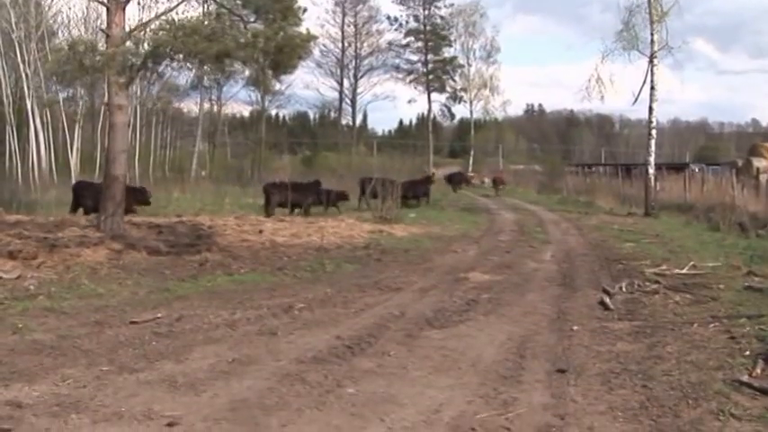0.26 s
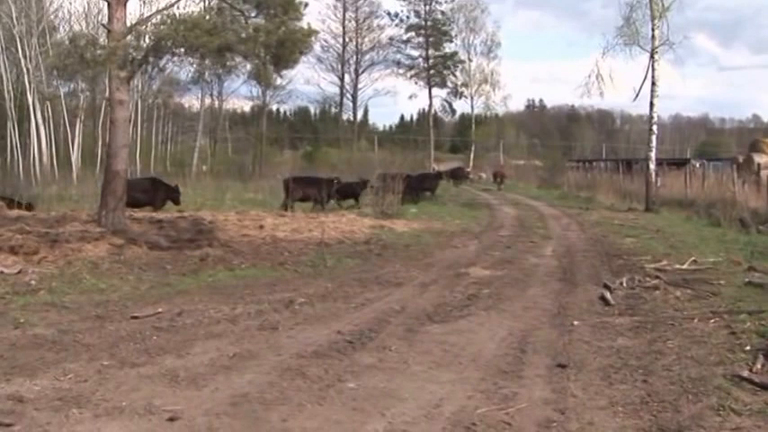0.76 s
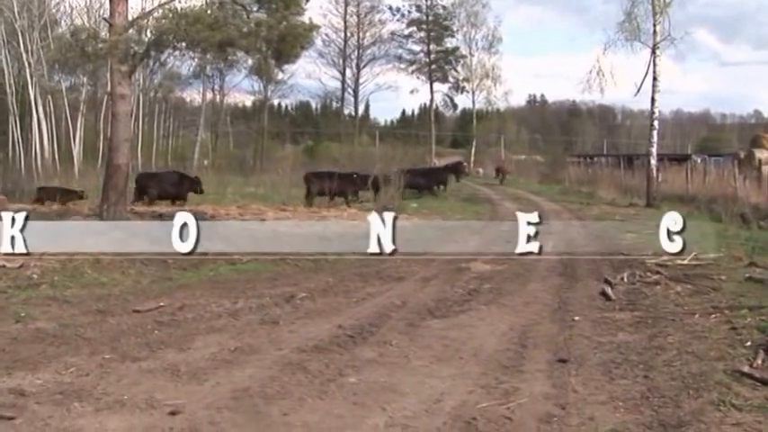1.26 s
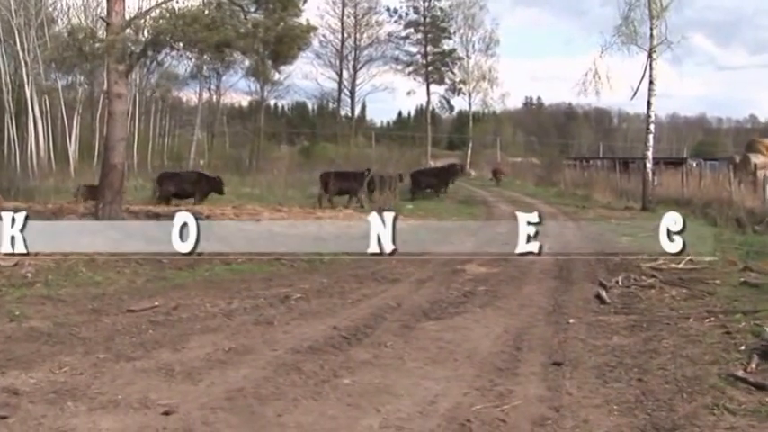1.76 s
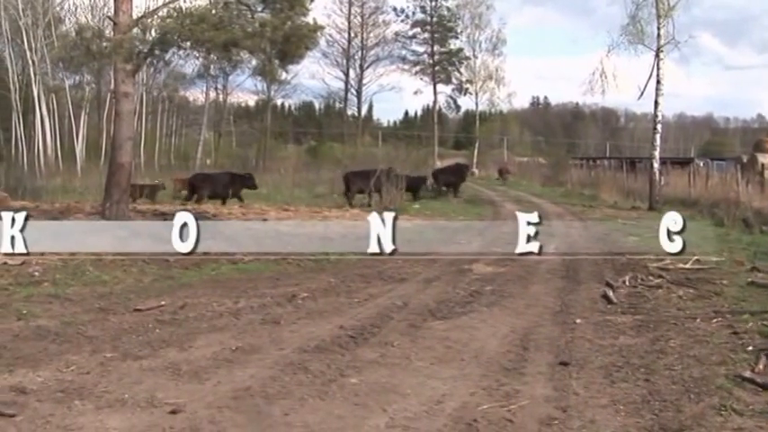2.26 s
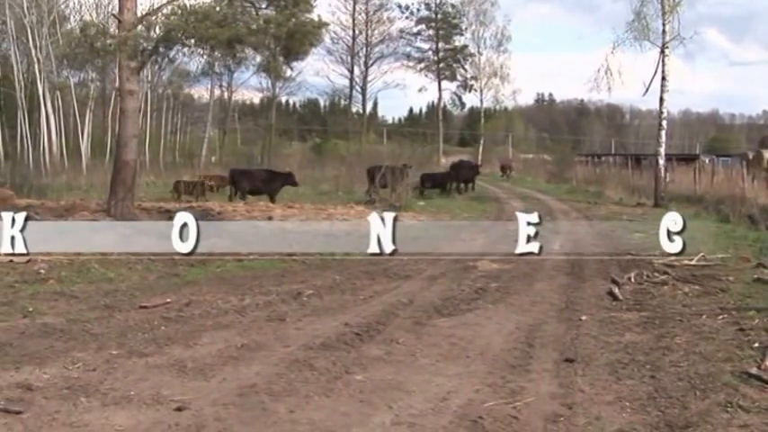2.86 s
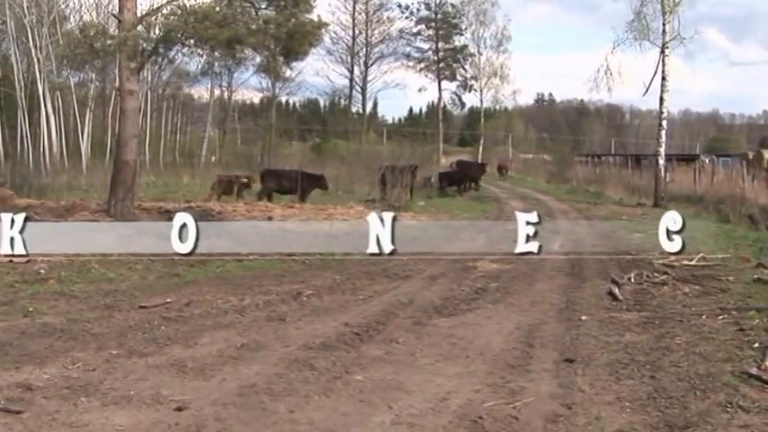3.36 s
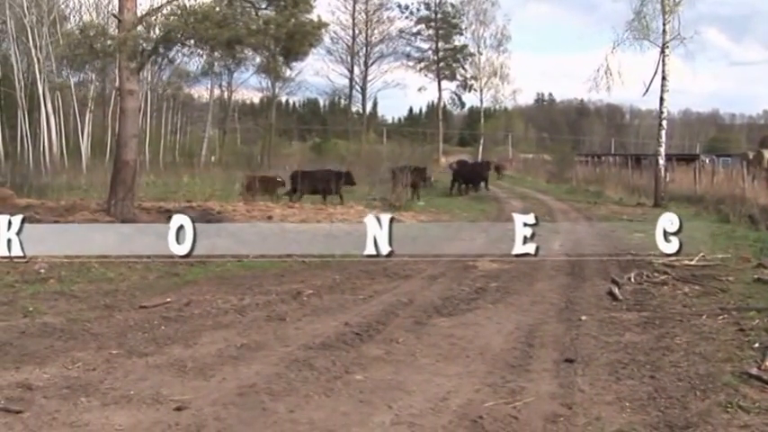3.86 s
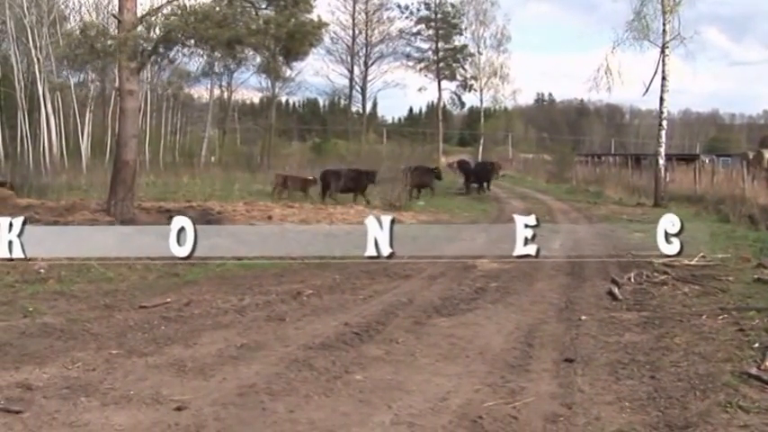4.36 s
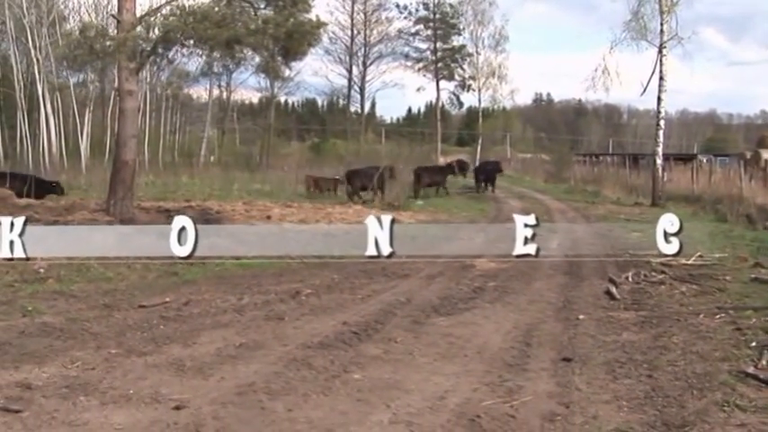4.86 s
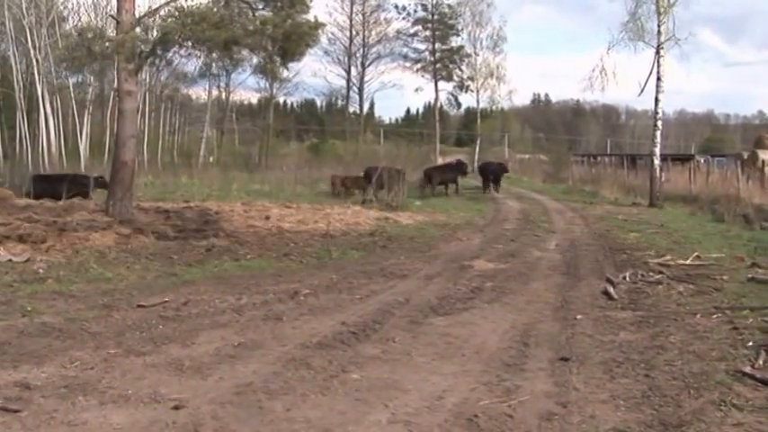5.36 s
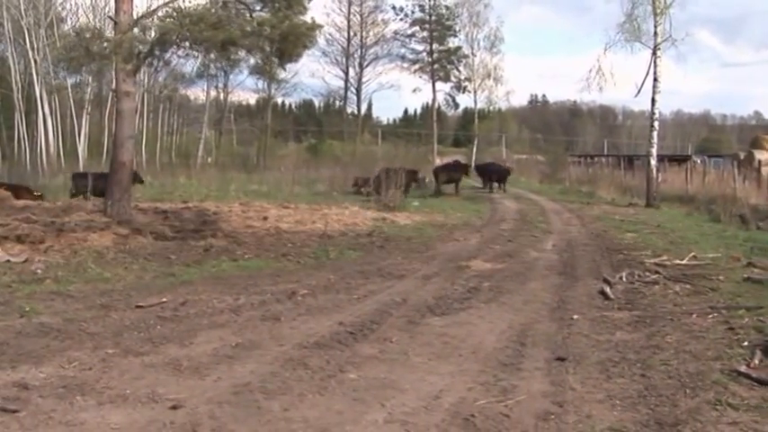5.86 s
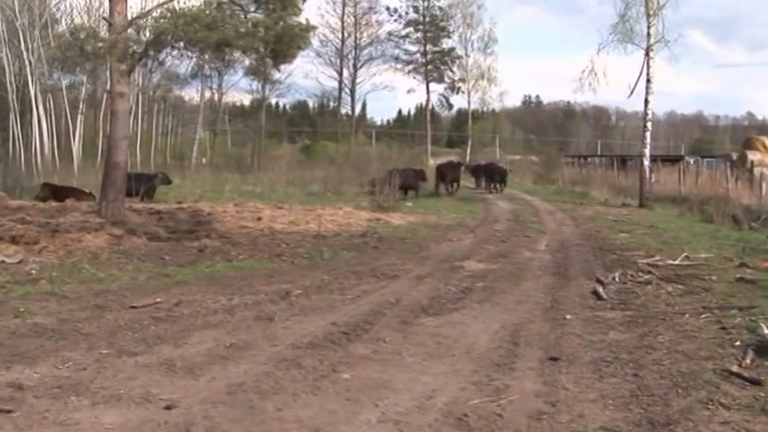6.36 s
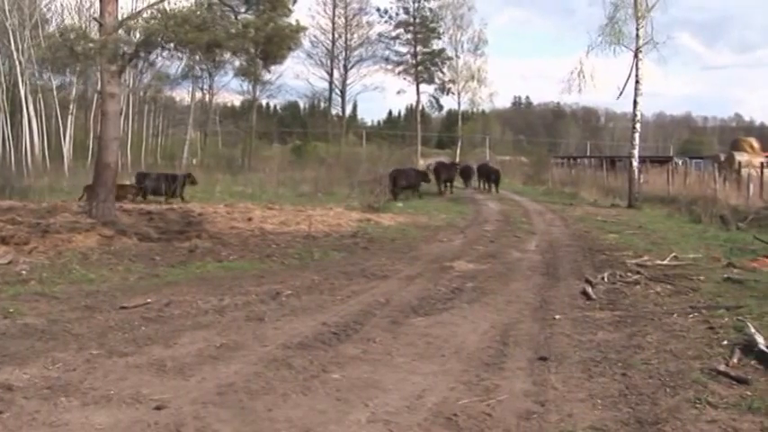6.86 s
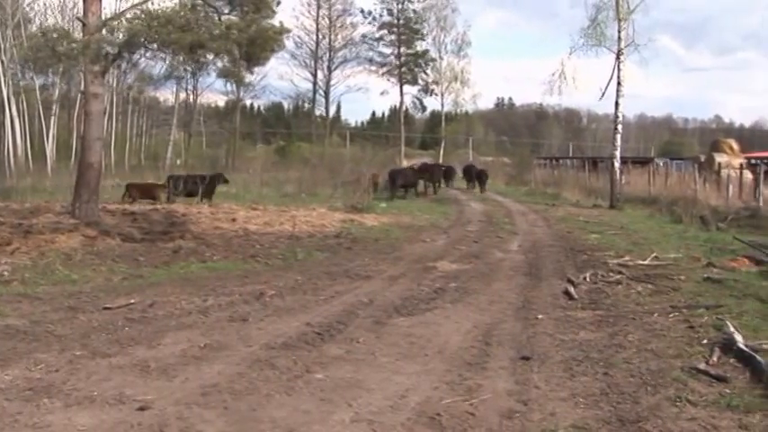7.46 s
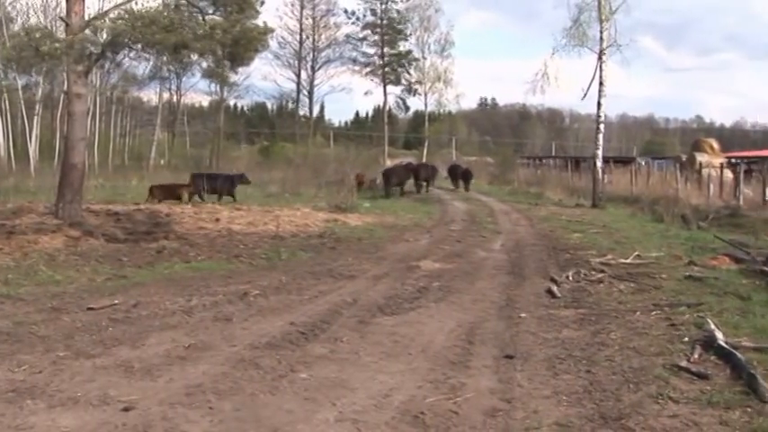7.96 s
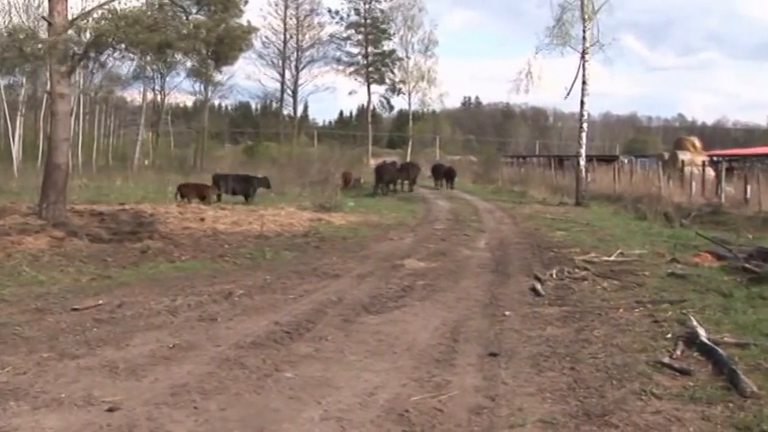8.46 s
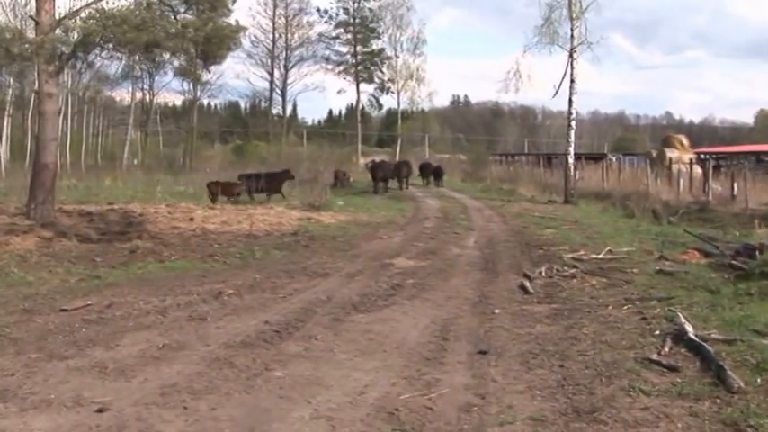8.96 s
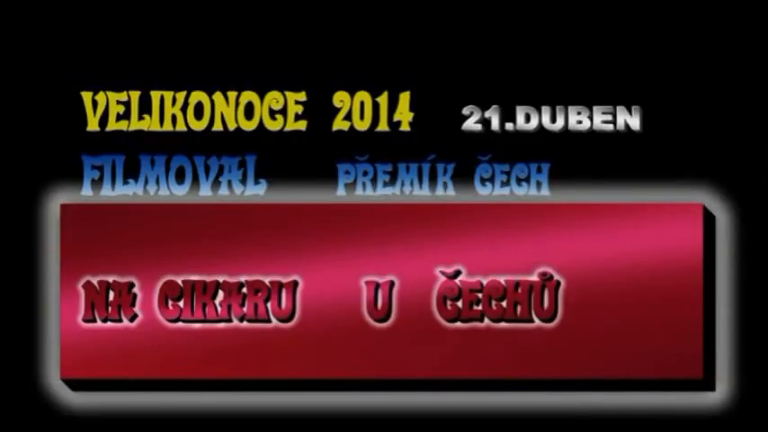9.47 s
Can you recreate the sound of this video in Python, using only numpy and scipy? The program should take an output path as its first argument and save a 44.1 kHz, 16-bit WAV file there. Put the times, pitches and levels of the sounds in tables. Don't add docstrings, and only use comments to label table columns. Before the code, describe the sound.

A stereo outdoor scene: moos of varied pitch overlap at once, mostly right of centre, with a blurred murmur of farther cattle and a dull echo from trees. An idling diesel throbs and rattles underneath throughout. Grass crackles brightly at left, occasional twigs crack, and thin bird whistles appear twice. Later, deep nasal lows from a close cow stand out almost centrally, the last one cut off by the sudden end.

```python
import sys
import numpy as np
from scipy import signal
from scipy.io import wavfile
from scipy.ndimage import uniform_filter1d

SR = 44100
rng = np.random.default_rng(int(sys.argv[2]) if len(sys.argv) > 2 else 0)


def wav_out(sig):
    wavfile.write(sys.argv[1], SR, np.round(np.clip(np.atleast_2d(sig).T, -1, 1) * 32767).astype(np.int16))


def level_to_linear(level):
    exponent = np.asarray(level, float) / 20
    return 10 ** exponent


N = 428211
TIME = np.arange(N) / SR
END_S = 9.2445
ENGINE_CYCLE_HZ, ENGINE_START_CYCLES = 5.741, .94
LEFT_RIGHT = np.array([[1], [-1]])


def at_hz(points, hz):
    point_hz, value = np.transpose(points)
    return np.interp(np.log(hz), np.log(point_hz), value)


def bandpass(x, low_hz, high_hz, order=2):
    return signal.sosfilt(signal.butter(order, [low_hz, high_hz], "band", fs=SR, output="sos"), x)


def drift(rate_hz, size):
    r = np.exp(-80 * np.pi * rate_hz / SR)
    white = rng.standard_normal(max(size, 2 * SR) // 40 + 1002)
    slow = signal.lfilter([1], [1, -2 * r, r * r], white)[500:]
    return np.interp(np.arange(size) / 40, np.arange(len(slow)), slow / slow.std())


def banded_noise(spectrum, gate_db, patchy_db, extra_width_db):
    # (frequency [Hz], side minus mid [dB])
    width = [(60, -14), (180, -20), (550, 0), (1650, -11), (4970, 4), (15000, -0.5)]
    # (frequency [Hz], left minus right [dB])
    balance = [(60, 0.5), (240, -2), (950, 2.5), (3770, 2), (15000, 3)]
    out = 0
    edges_hz = 100 * 2 ** np.arange(0, 7.4, 1 / 3)
    white = rng.standard_normal((2, 2, N))
    for k, (low_hz, high_hz) in enumerate(zip(edges_hz, edges_hz[1:])):
        mid, side = bandpass(white[k % 2], low_hz, high_hz, 3)
        hz = np.sqrt(low_hz * high_hz)
        gain = level_to_linear(at_hz(spectrum, hz) + gate_db(hz) + patchy_db * drift(10.3, N))
        lean = level_to_linear(at_hz(balance, hz) / 2 * LEFT_RIGHT)
        side_gain = level_to_linear(at_hz(width, hz) + extra_width_db)
        out = out + gain * lean * (mid + side_gain * side * LEFT_RIGHT)
    return out / out.mean(axis=0).std()


def moo(tract, voice, tone, aside, rows):
    # (frequency [Hz], left minus right [dB])
    right_lean = [(200, .8), (400, .1), (600, -4.5), (830, -1.5), (1000, -6), (1250, -6), (1550, -10),
                  (2300, -6)]
    # (frequency [Hz], lag [rad])
    lag = [(200, .08), (400, .6), (600, 1), (850, 1.3), (1150, .9), (1400, 1.5), (1520, 2.5), (1750, .3),
           (2300, .1)]
    dulling_db = 8
    (first, second, rough, *octave), (hum_db, bright_db) = voice, tone
    s, pitch_hz, lower_db, upper_db = np.transpose(rows)
    span = slice(round(s[0] * SR), round(s[-1] * SR))
    t, out = TIME[span], np.zeros((2, N))
    smooth_hz = uniform_filter1d(np.interp(t, s, pitch_hz), 900, mode="nearest")
    phase = 2 * np.pi * np.cumsum(smooth_hz * (1 + .02 * rough * drift(25, len(t)))) / SR
    since_s = t - s[0] + (s[0] == 0)
    left_s = s[-1] - t + (s[-1] > END_S - .02)
    edge = np.clip(np.minimum(since_s, left_s) / .03, 0, 1)
    closing_db = dulling_db * ((s - s[0]) / (s[-1] - s[0])) ** 2
    lower = lower_db - at_hz(tract, first * pitch_hz)
    upper = upper_db - at_hz(tract, second * pitch_hz)
    step = 1 + len(octave)
    for k in range(step, 19, step):
        if k * pitch_hz.max() > 3400:
            break
        effort_db = lower + (upper - lower) * np.clip((k - first) / (second - first), 0, 1)
        colour_db = at_hz(tract, k * pitch_hz) + hum_db * (k == 1) - 15 * (1 < k < first)
        colour_db = colour_db + (bright_db - closing_db) * (k > second)
        level = np.sqrt(2) * level_to_linear(np.interp(t, s, effort_db + colour_db)) * edge
        level *= 1 + rough ** .5 * (.3 * drift(6, len(t)) + .55 * drift(45, len(t)))
        hz = k * np.median(pitch_hz)
        ears = level_to_linear(aside * at_hz(right_lean, hz) * np.array([.5, -.5]))
        ears = ears * np.exp(-.5j * aside * at_hz(lag, hz) * np.array([1, -1]))
        ears = ears[:, None] / abs(ears.mean())
        out[:, span] += level * np.imag(ears * np.exp(1j * (k * phase + k * k)))
    return out


def arch(share, top, rise, fall, rise_bend, fall_bend):
    top = np.clip(top, .02, .98)
    early = np.maximum(1 - share / top, 0)
    late = np.maximum((share - top) / (1 - top), 0)
    return -rise * early ** rise_bend - fall * late ** fall_bend


def herd_call(event, pitch, tone):
    sag_bend, swell_bend, fade_bend = 2.7, 2.3, 2.2
    s, length_s, lower_db, upper_db, loudest = event
    from_hz, top_hz, end_hz, top, bend = pitch
    *_, swell_db, fade_db, trail = tone
    share = np.linspace(0, 1, 25)
    hz = top_hz + arch(share, top, top_hz - from_hz, top_hz - end_hz, bend, sag_bend)
    lower = lower_db + arch(share, loudest, swell_db, fade_db, swell_bend, fade_bend)
    upper = upper_db + arch(share, loudest + trail, swell_db, fade_db, swell_bend, fade_bend)
    return np.transpose([s + length_s * share, hz, lower, upper])


def herd():
    # (start [s], length [s], lower overtone [dB], upper overtone [dB], loudest at [share])
    events = [(0, .64, -28, -14, .45), (0, 0.71, -23.5, -26, 0.25), (.55, .8, -36, -27.5, .62),
              (1.052, 0.72, -34, -31, 0.17), (1.269, 1.31, -20, -21.5, .52), (1.88, 0.57, -48, -38, 0.66),
              (2.097, .58, -38, -46, 0.88), (2.72, 0.57, -29.5, -29, 0.58), (2.981, 0.27, -37, -23.5, .4),
              (3.219, .33, -32.5, -17, 0.6), (3.02, 0.75, -28, -26, 0.39), (3.46, .69, -27, -33, .8),
              (3.88, .43, -48, -27, .65), (5.03, 0.86, -24, -27, .45), (5.251, 1.53, -27.5, -24, .35),
              (5.721, 0.71, -32, -30.5, 0.42), (5.98, .97, -27, -22.5, .48), (5.959, 0.77, -20.5, -24, .55),
              (6.899, .4, -37, -26, .35), (7.14, .66, -26.5, -19, .75), (7.219, 0.84, -25.5, -26.5, 0.59),
              (7.74, 0.4, -28, -26.5, .7), (8.1, 0.68, -31.5, -27.5, 0.45), (8.8, 0.45, -31, -26.5, 1)]
    # (start [Hz], top [Hz], end [Hz], top at [share of length], bend of rise [1 = straight])
    pitches = [(267, 276, 265, .32, 2.1), (283.3, 284, 232, .25, 1.9), (164.5, 213.5, 204, .55, 1.9),
               (210.2, 222, 223, .7, 2.1), (164.7, 197.3, 167, .6, 2.6), (208.3, 211.8, 206.8, 0.405, 2.15),
               (313.4, 316.8, 316.4, 0.78, 1.3), (303, 338, 340, .9, 1.5), (245, 254.2, 280, .68, 1.29),
               (296.5, 298, 293, .7, 1.46), (154.8, 206.6, 170, .72, 1.4), (211.7, 215.5, 180, .85, 4.95),
               (228.7, 240, 228.5, .75, 1.5), (159.2, 205, 168, .62, 1.9), (229, 258, 243.5, .65, 2.5),
               (210.5, 214, 213.4, 0.51, 1.5), (318, 331.3, 311, .52, 1.6), (173, 194, 177, .6, 2.1),
               (201.5, 201, 196.5, .1, 2.1), (295, 341, 380, 0.96, 2.5), (162, 196.5, 174, .7, 2.6),
               (171.3, 206, 240, 0.96, 1.1), (206.8, 213, 199.4, .75, 4), (300, 322.3, 322.3, 1, 2.2)]
    voices = [(2, 4, .03, 2), (2, 3, .05), (3, 4, .06), (3, 6, .1), (3, 6, .02), (3, 5, .1), (1, 4, .12),
              (2, 4, .15), (3, 5, .3), (2, 4, .3), (3, 6, .1), (3, 6, .03), (2, 4, .03), (3, 6, .22),
              (3, 5, .08), (3, 6, .06), (2, 4, .08), (3, 7, .06), (3, 6, .2), (2, 4, .12), (3, 6, .07),
              (3, 5, .12), (3, 6, .07), (2, 4, .06)]
    # (fundamental hum [dB], top brightness [dB], swell [dB], fade [dB], upper trails by [share])
    tones = [(-13, -2.2, 10, 7, .01), (-7, -9, 3, 12, -0.058), (7, -11, 13, 3, .01),
             (-27, .2, -1, 21, 0.043), (-15, -1.5, 21, 27, -.22), (-9.5, 8, 15, 1.5, .01),
             (9, 3.5, 11, 12, -0.0028), (.6, -0.5, 15, 7, -0.18), (-4, -3, 2, 15, 0.12),
             (4, -11.5, 16, 23, .01), (2.5, -3.1, 16.5, 9.5, 0.052), (2.5, 10.5, 6, 21, .01),
             (-10, -19, 14, 7, -0.068), (2.2, 0, 9, 5, .15), (-12, -2.2, 18, 19, .37), (6, 5, 9, 3, .01),
             (-6, -2.5, 16, 7.5, 0.093), (-10, 2.2, 14, 13, -.15), (3, -2, 10, 12, .01),
             (-4, -2.5, 19, 33, -.48), (1.5, -.5, 15, 6, 0.13), (5, -14, 7, .3, -0.019),
             (5, 1.2, 3.5, 1, .01), (-6, -1.2, 15, -5, 0.049)]
    # (frequency [Hz], level [dB])
    throat = [(200, -0.5), (400, -14), (590, 0.5), (810, -12.5), (1000, -4), (1180, 1.5), (1350, 0.5),
              (1470, -11.5), (1660, -5), (2000, -10), (2550, -9), (3500, -28)]
    return sum(moo(throat, voice, tone[:2], 1, herd_call(event, pitch, tone))
               for voice, tone, event, pitch in zip(voices, tones, events, pitches))


def trees(x, t60_s, dull_hz):
    t = np.arange(round(.8 * SR)) / SR
    tail = rng.standard_normal((2, len(t))) * level_to_linear(-60 * t / t60_s) * (t > .03)
    tail = bandpass(tail, 350, dull_hz)
    tail = tail / np.sqrt((tail ** 2).sum(axis=1, keepdims=True))
    return signal.fftconvolve(x, tail, axes=1)[:, :N]


def murmur():
    # (time [s], level [dB])
    swell = [(0.0, -19.5), (4.02, -20.5), (4.48, -26), (6.25, -18.5), (9.07, -20.5), (9.2, -54)]
    # (frequency [Hz], density [dB per Hz])
    colour = [(350, -44.5), (480, 4), (620, -6), (800, -4), (1150, 3.5), (1500, -1), (2200, -7.5),
              (3200, -37.5)]
    level = level_to_linear(np.interp(TIME, *np.transpose(swell)) - 5.5)
    return level * banded_noise(colour, lambda hz: 0, 2.5, .1)


def exhaust():
    # (share of engine cycle [0-1], level [dB])
    puff_table = [(0.079, -0.5), (0.189, -1), (0.379, -6), (.62, -1), (0.743, -4), (0.858, -1.5)]
    # (frequency [Hz], level [dB], t60 [s])
    modes = [(27, -33, .2), (42, -22.5, 0.25), (75.4, -20.5, 0.17), (96.4, -22.5, 0.16), (177, -28, .1),
             (257.5, -26, 0.089)]
    cycles, puffs = np.arange(-3, 53)[:, None], np.zeros(N + SR)
    share, db = np.transpose(puff_table)
    at = ((cycles + ENGINE_START_CYCLES + share) / ENGINE_CYCLE_HZ * SR + SR).astype(int)
    puffs[at] = level_to_linear(db + 2.3 * rng.standard_normal(at.shape))
    out = 0
    for k, (hz, level_db, t60_s) in enumerate(modes):
        r, w = level_to_linear(-60 / (t60_s * SR)), 2 * np.pi * hz / SR
        ring = signal.lfilter([0, np.sin(w)], [1, -2 * r * np.cos(w), r * r], puffs)
        out = out + (-1) ** k * level_to_linear(level_db) * ring
    return bandpass(out, 22, 400)[SR:]


def rumble():
    level_db, side_db = -40, -5
    mid, side = bandpass(rng.standard_normal((2, N)), 25, 110)
    return level_to_linear(level_db) / mid.std() * (mid + level_to_linear(side_db) * side * LEFT_RIGHT)


def rattle():
    # (share of engine cycle [0-1], level over steady rattle [dB], length [s])
    knocks = [(0.06, 5.2, 0.014), (0.336, 3.5, 0.005), (.59, 2, 0.0078), (.82, 0.3, 0.0091)]
    # (frequency [Hz], density [dB per Hz])
    colour = [(100, 4.5), (160, -0.5), (280, 3), (400, -14), (1000, -2), (2000, -19.5), (2600, 4),
              (3200, -20.5), (4000, -20.5), (5900, -29.5), (7000, -49), (8500, -60), (11500, -37.5),
              (15700, -43.5)]
    level_db = -25
    turn = TIME * ENGINE_CYCLE_HZ - ENGINE_START_CYCLES
    swell_db = 0
    for share, db, length_s in knocks:
        from_knock_s = ((turn - share + .5) % 1 - .5) / ENGINE_CYCLE_HZ
        swell_db = swell_db + db * np.exp(-(from_knock_s / length_s) ** 2)
    swell_db = swell_db * (1 + 0.17 * drift(6.2, N))

    def gate_db(hz):
        return swell_db * np.interp(hz, [1500, 2880, 4200, 5840, 8260], [0.27, 1.39, 0.56, 1.59, .3])

    return level_to_linear(level_db) * banded_noise(colour, gate_db, 1.56, 0.11)


def rustle():
    # (time [s], peak [dB])
    snaps = [(0.8205, -34.5), (0.9692, -44), (.42, -38), (1.62, -39), (1.908, -28), (2.0328, -39.5),
             (2.4543, -37), (3.3852, -34.5), (3.4226, -31.5), (3.7259, -28.5), (3.9589, -39.5),
             (4.0841, -36), (4.142, -40.5), (4.2672, -35.5), (5.05, -40), (5.9414, -37), (7.04, -39),
             (7.9788, -35), (8.0701, -31), (8.2053, -42)]
    crackle_per_s, spread_s, calm = 130, .07, .3
    stir = calm + sum(level_to_linear((db + 32) / 2) * np.exp(-((TIME - s) / spread_s) ** 2) for s, db in snaps)
    clicks = level_to_linear(-54 + 3.8 * np.minimum(rng.exponential(1, N), 5))
    clicks = clicks * (rng.random(N) < crackle_per_s * stir / SR)
    for s, db in snaps:
        clicks[round(s * SR)] = level_to_linear(db + 5.0)
    decay = signal.lfilter([1], [1, -np.exp(-1 / (0.0054 * SR))], clicks)
    burst = decay * rng.standard_normal((2, N))
    burst[1] = 0.607 * burst[0] + .5 * burst[1]
    return bandpass(burst, 9000, 16500, 4) * level_to_linear(2.5 * LEFT_RIGHT)


def twigs():
    # (time [s], peak [dB])
    cracks = [
        (1.9076, -28),
        (4.2667, -26),
        (4.7451, -28),
        (5.0489, -27),
        (7.0369, -21),
    ]
    ring_s = .003
    clicks = np.zeros(N)
    for s, db in cracks:
        clicks[round(s * SR)] = level_to_linear(db - 1.5)
    decay = signal.lfilter([1], [1, -np.exp(-1 / (ring_s * SR))], clicks + 1e-18)
    return bandpass(decay * rng.standard_normal(N), 3300, 8000) * level_to_linear(1.5 * LEFT_RIGHT)


def near_call(event, effort):
    # (time before break [s], pitch [Hz], fundamental [dB], second overtone [dB])
    run_up = [(.87, 61.6, -34, -48), (.62, 80, -25, -43), (.41, 85, -32, -28.5), (.23, 102, -27.5, -26),
              (.115, 127, -25.5, -22), (.05, 150, -18, -20), (.016, 167, -18.5, -34)]
    break_hz, rest_hz, close_sag = 214, 200.5, .88
    settle_s, push_s, close_s = .19, .11, .05
    break_db, second_db, close_db = -2, -14.5, -17.5
    (s, jump, end, end_hz), (run_db, held_db, last_db, share_db) = event, effort
    before, *columns = np.transpose(run_up)
    times = np.linspace(s, jump - before[-1], 40)
    hz, first_db, upper_db = (np.interp(times, jump - before, c) for c in columns)
    rows = [*zip(times, hz, first_db + run_db, upper_db + run_db + share_db)]
    settled = jump + min(settle_s, (end - jump) / 2)
    held = [(jump, min(break_hz, 1.25 * end_hz), held_db + break_db),
            (settled, min(rest_hz, end_hz), held_db)]
    for ahead_s in (push_s, close_s):
        if end - ahead_s > settled:
            held.append((end - ahead_s, end_hz, last_db))
    held.append((end, close_sag * end_hz, last_db + close_db))
    return rows + [(t, f, db, db + second_db + share_db) for t, f, db in held]


def near_cow():
    # (start [s], voice break [s], end [s], closing pitch [Hz])
    lows = [
        (4.451, 5.315, 5.5, 172),
        (6.369, 6.772, 7.215, 198.6),
        (7.931, 8.166, 8.67, 210),
        (9.028, 9.256, 9.4, 199.6),
        (2.45, 2.52, 2.98, 160),
    ]
    # (run-up [dB], settled [dB], closing [dB], second overtone's share [dB])
    efforts = [(1.5, -16, -19, 1.5), (-.3, -6, -5.5, -1.5), (-.3, -10.3, -6.2, 2.6), (-3, -11, -12, -9),
               (-30, -31, -30, -5)]
    # (frequency [Hz], level [dB])
    nose = [(80, 17.5), (200, 1.5), (420, -10), (520, -12), (640, -23.5), (1200, -36), (2000, -47),
            (3500, -60)]
    return sum(moo(nose, (1, 2, .04), (0, 0), .15, near_call(*low)) for low in zip(lows, efforts))


def bird():
    # (start [s], length [s], start pitch [Hz], end pitch [Hz], level [dB])
    whistles = [(2.893, 0.033, 3800, 3920, -46), (2.97, .06, 4600, 4500, -45),
                (3.09, 0.039, 4600, 4580, -47), (3.2, 0.067, 4520, 4600, -48),
                (3.322, .05, 4500, 4570, -49), (3.44, .05, 4520, 4600, -52), (3.58, 0.039, 4520, 4520, -57),
                (3.666, 0.055, 4500, 4520, -52), (5.376, .04, 4430, 4200, -48),
                (5.5, 0.036, 4620, 4650, -49), (5.6, .09, 4640, 4620, -54), (5.737, 0.048, 4620, 4610, -51),
                (5.9, .05, 4200, 4310, -53)]
    out = np.zeros(N)
    for s, length_s, from_hz, to_hz, db in whistles:
        size, at = round(length_s * SR), round(s * SR)
        phase = 2 * np.pi * np.cumsum(np.linspace(from_hz, to_hz, size)) / SR
        out[at:at + size] += level_to_linear(db) * 2.2 * np.hanning(size) ** 0.32 * np.sin(phase)
    return out


def scene():
    cattle = herd() + near_cow()
    echo = level_to_linear(-17.5) * trees(cattle, 0.94, 2500)
    engine = exhaust() + rumble() + rattle()
    return cattle + echo + murmur() + engine + rustle() + twigs() + bird()


def top_cut(x):
    return signal.sosfilt(signal.butter(12, 15740, fs=SR, output="sos"), x)


def record(dry):
    x = signal.sosfilt(signal.cheby2(12, 60, 16150, fs=SR, output="sos"), dry)
    mix = np.clip(x, -1, 1) * (TIME < END_S)
    return top_cut(mix)


dry = scene()
out = record(dry)
wav_out(out)
```